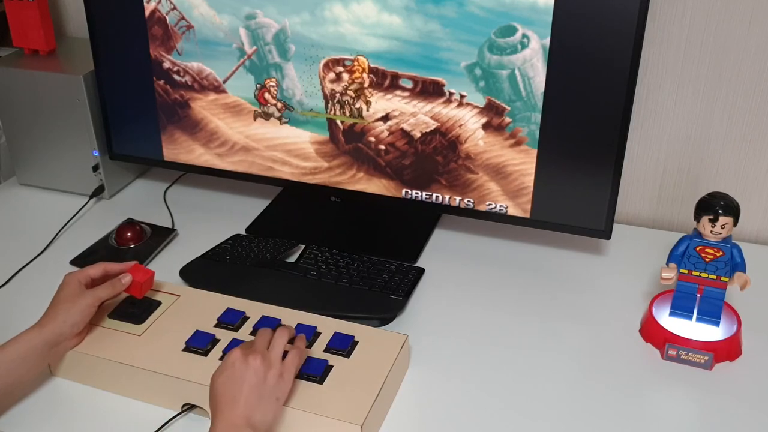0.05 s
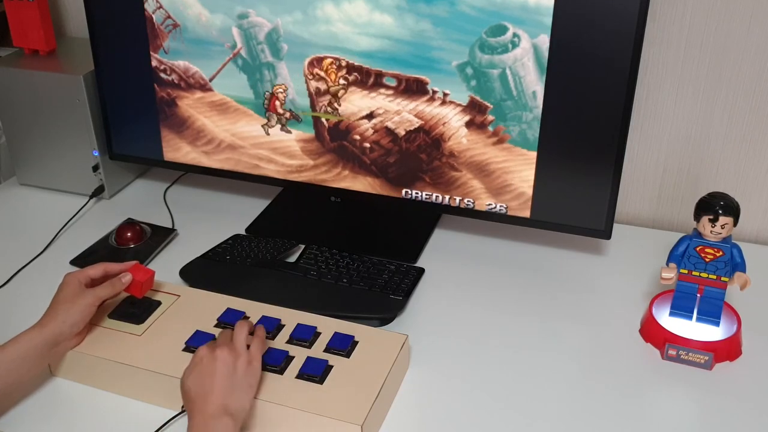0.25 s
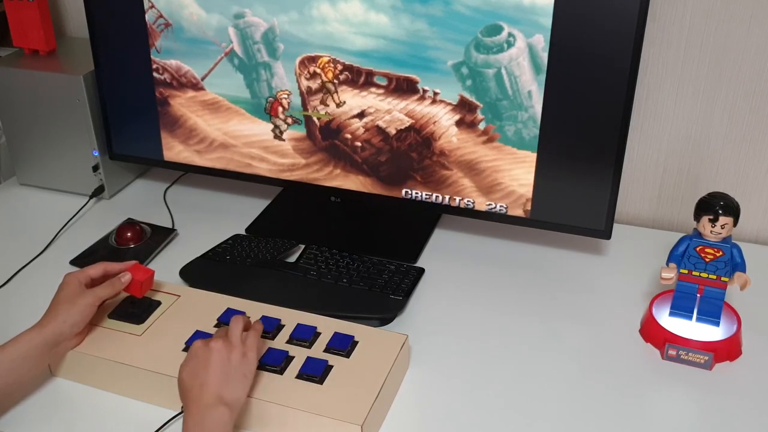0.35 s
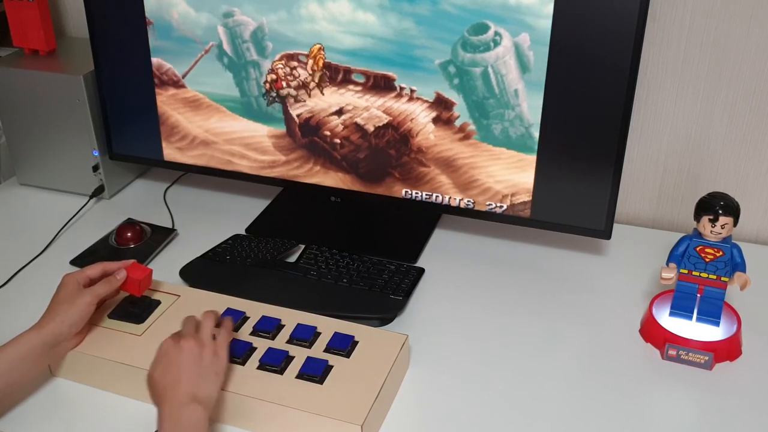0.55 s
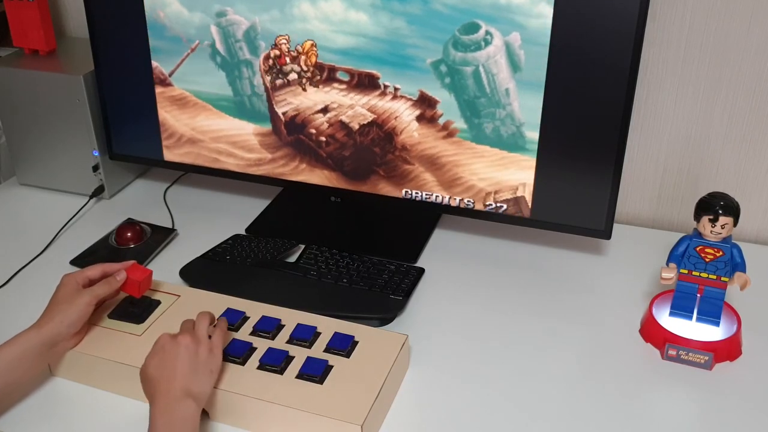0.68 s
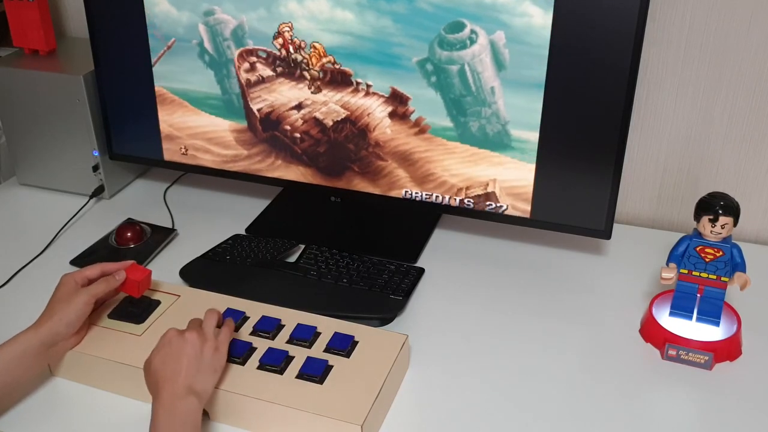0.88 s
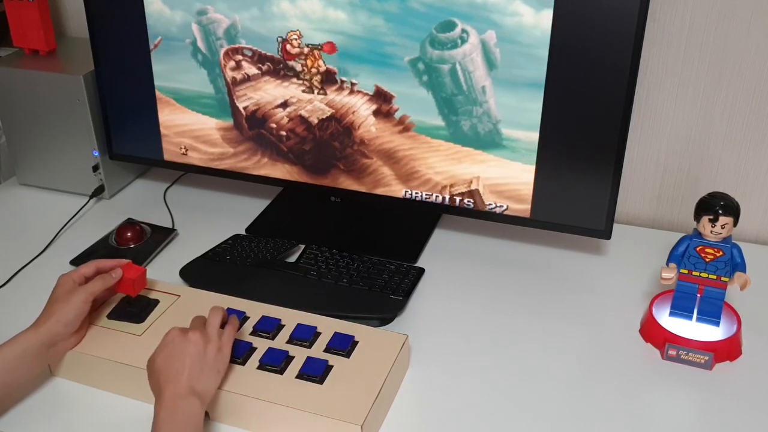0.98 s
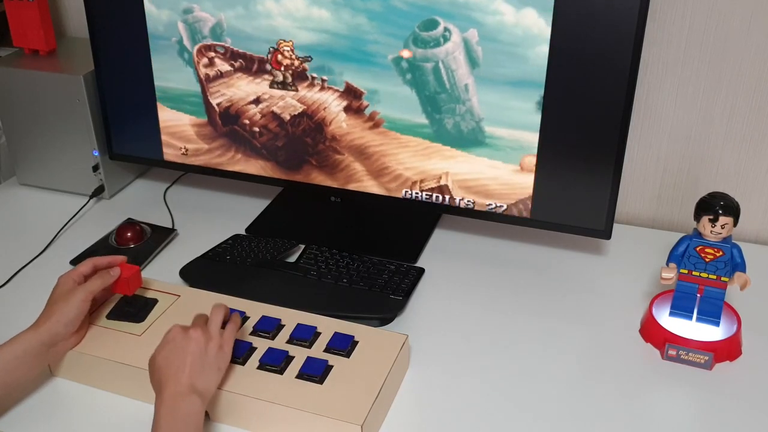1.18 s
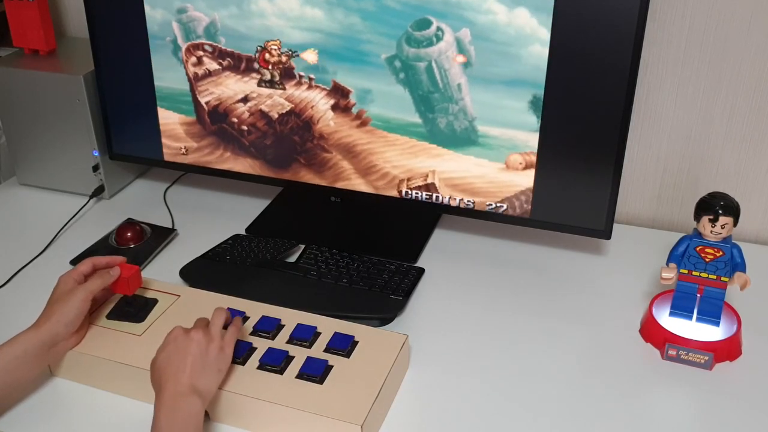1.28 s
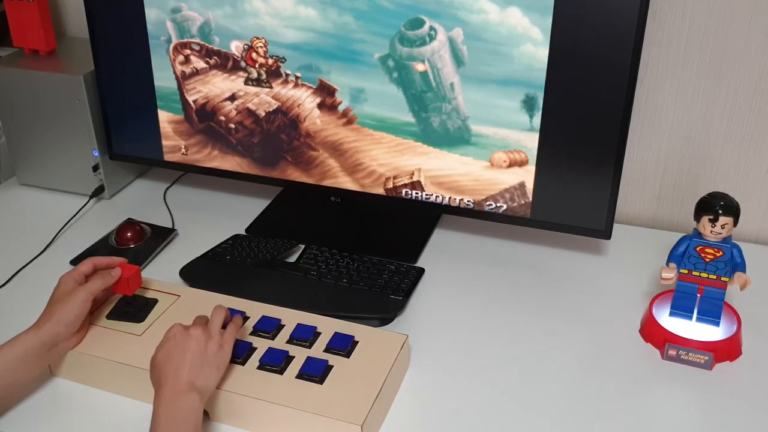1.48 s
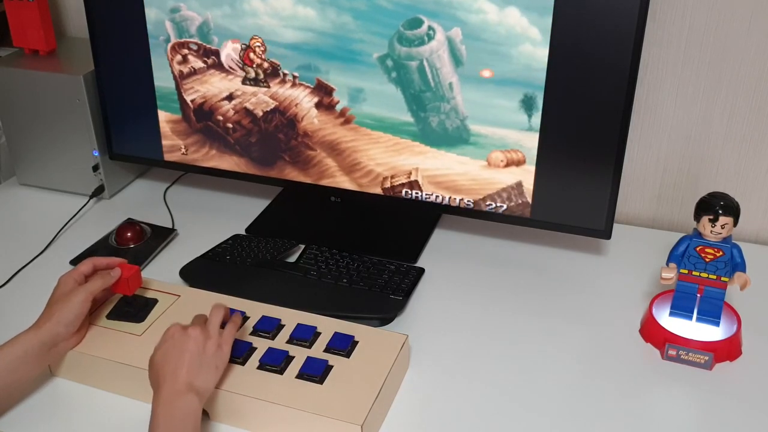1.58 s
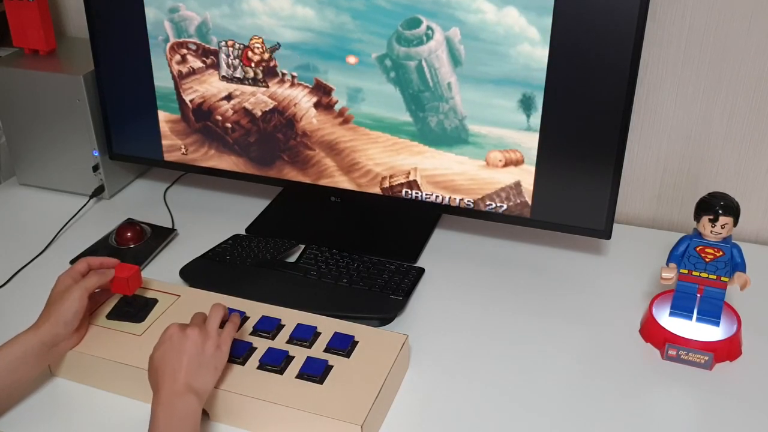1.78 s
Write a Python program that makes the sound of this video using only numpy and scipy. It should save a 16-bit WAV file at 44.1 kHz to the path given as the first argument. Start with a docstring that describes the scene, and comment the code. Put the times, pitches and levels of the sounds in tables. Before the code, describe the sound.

Buttons and joystick clack against a hollow cardboard box in quick uneven bursts, with desk thuds and faint scraping; the hits weaken toward the end. Small reflective room, stereo pickup, faint hiss and no game sound.

```python
"""A small, bare room: a homemade cardboard arcade controller is played on a desk before two microphones.
Buttons and stick knock on the hollow box, their switches click, and the hands thump the box onto the desk.
Each blow is a push, a rattle and a room tail of noise, filtered to its colour; box and desk add damped sines.
The stick scrapes in its cardboard gate as random grains smeared by the room, and the hollow box rumbles as
resonant noise, over a faint rumble and hiss of filtered noise."""
import sys
import numpy as np
from scipy import signal
from scipy.fft import rfft, irfft, next_fast_len
from scipy.io import wavfile

SR = 44100
rng = np.random.default_rng(int(sys.argv[2]) if len(sys.argv) > 2 else 0)


def put_to_file(sound):
    """Save the sound as 16-bit audio at rate SR, in the file named by the first command-line argument."""
    columns = np.atleast_2d(sound).T  # one column per channel
    safe = np.clip(columns, -1, 1)
    whole_steps = np.round(safe * 32767)
    wavfile.write(sys.argv[1], SR, whole_steps.astype(np.int16))


N = 81585  # length in samples
HIT_T = np.arange(int(.55 * SR)) / SR  # time within one blow, s


def knocks():
    """Buttons and stick knock the hollow box; hard landings add a bright edge with a strong room tail."""
    # Each row: start in seconds, level in dB, hard edge in dB relative to the knock, pitch ratio of the knock's colour.
    knock_rows = [(0.001, -43.5, -19, 0.75), (0.192, -37.5, -0.5, 0.66), (0.1976, -29, -7.5, 1.13),
                  (0.215, -31, -1.5, 1.03), (0.234, -28.5, -0.5, 0.94), (0.2434, -25, -6.5, 0.99),
                  (0.3662, -43.5, -23, 0.86), (0.405, -39, -23, 0.92), (0.420, -33, -24, 0.97),
                  (0.433, -33.5, -18, 1.14), (0.4385, -23, -18, 0.966), (0.455, -27.5, -11, 0.99),
                  (0.569, -28.5, -11.5, 1.12), (0.582, -27.5, -9.5, 0.89), (0.760, -31.5, -12, 1.04),
                  (0.7758, -17, -7.5, 1.045), (0.780, -19, -4, 1.08), (0.801, -24.5, -6, 0.99),
                  (0.815, -31.5, -7, 1.16), (0.839, -27.5, -15, 0.87), (0.875, -38, -1.5, 0.68),
                  (0.9364, -29.5, -16, 0.92), (0.957, -33, -9.5, 1), (0.994, -35.5, -20, 1.18),
                  (1.002, -29.5, -0.5, 0.98), (1.060, -35.5, -6, 1.08), (1.1005, -22, -19.5, 1.05),
                  (1.121, -28.5, -18, 0.97), (1.166, -40, -13, 0.74), (1.182, -29.5, -25, 1.1),
                  (1.1864, -32, -16, 1.13), (1.305, -36, -35, 1.23), (1.326, -33, -30, 0.74),
                  (1.371, -30.5, -24, 0.95), (1.376, -26.5, -24, 1.025), (1.402, -37, -4.5, 0.88),
                  (1.4442, -35, -9, 0.86), (1.5104, -29.5, -11, 0.97), (1.549, -31, -19, 0.93),
                  (1.596, -44, -0.5, 0.75), (1.622, -39.5, -3, 0.97), (1.7457, -35.5, -21, 0.67),
                  (1.758, -42, -19, 1.22)]
    # Lasting rings of the box. Each row: frequency in Hz, relative level in dB, t60 in seconds.
    box_modes = [(396, -8, 0.41), (495.5, 0, 0.31), (584.6, 5, 0.27), (634.6, -6.5, 0.21), (741, -8, 0.27),
                 (797, -7, 0.28), (833, 7, 0.084), (861, 2, 0.2), (950, -7, 0.35), (1008, -3.5, 0.2),
                 (1087, -3, 0.13), (1250, -21, 0.14), (1700, -28, 0.3)]
    # Colour of the hollow knock. Each row: frequency in Hz, gain in dB.
    knock_colour = [(120, -24), (300, -14.5), (450, -16), (600, 2.5), (780, 1.5), (1000, -3.5),
                    (1200, -21.5), (1600, -18), (2500, -63.5), (5000, -52.5)]
    # Colour of the hard edge. Each row: frequency in Hz, gain in dB.
    edge_colour = [(500, -21.5), (1100, 3.5), (1700, -3), (2300, -11), (3200, -14), (3600, -25.5),
                   (6000, -22), (12000, -26.5)]
    ring_db = -3  # the box's ring relative to the knock, before choking
    damping_edge_db = -11  # landings harder than this hold the lid down and choke its ring
    out = np.zeros((2, N))
    for start_s, db, edge_db, pitch in knock_rows:
        hit = contact(rattle_t60=0.028, rattle_db=0, room_t60=0.18, room_db=-2, build_s=0.012, width=0.78)
        hit = dent(reflect(hit), depth_db=6.0, order=260)
        knock = unit(colour(hit, knock_colour, pitch))

        choke = np.hypot(1, undb(edge_db - damping_edge_db))
        lid = ring(box_modes, scatter_db=4.0, spread=0.41, attack_s=0.0027) / choke
        body = knock + undb(ring_db) * lid

        crack = contact(rattle_t60=0.057, rattle_db=3.5, room_t60=0.25, room_db=8.5, build_s=0.0028)
        edge = unit(colour(dent(crack, depth_db=1.5, order=200), edge_colour))
        add(out, start_s, undb(db) * (body + undb(edge_db) * edge))
    return out


def thumps():
    """The hands' weight thuds through the box into the desk; where it lands decides which modes ring most."""
    # Each row: start in seconds, level in dB, deep boom in dB relative to the thump,
    # frequency in Hz around which the desk rings most.
    thump_rows = [(0.005, -49, 2, 210), (0.198, -37, 2, 131), (0.217, -35, 10, 192),
                  (0.237, -27.5, 10, 360), (0.25, -21.5, -12, 152.4), (0.300, -36.5, -8, 144),
                  (0.33, -44, 11, 200), (0.434, -32, -4, 210), (0.461, -34.5, -12, 118),
                  (0.608, -43.5, 7, 138), (0.777, -31, 4, 245), (0.792, -25, -2, 201),
                  (0.827, -40, -14, 144), (0.999, -33, 6, 220), (1.116, -35, -23, 270),
                  (1.322, -37.5, -25, 231), (1.413, -35, -1, 117), (1.483, -42, -9, 151),
                  (1.602, -38.5, 3, 199), (1.634, -41.5, 9.5, 152), (1.668, -50, -3, 198)]
    # Rings of the desk under the box. Each row: frequency in Hz, relative level in dB, t60 in seconds.
    desk_modes = [(117.1, 9.5, 0.12), (141.5, 5, 0.2), (212, -1, 0.3), (276.4, 2, 0.28), (291.4, -5, 0.26),
                  (399.2, 7.5, 0.16)]
    # Deep boom. Each row: frequency in Hz, relative level in dB, t60 in seconds.
    boom_modes = [(54.5, 33, 0.16), (66.4, -7, 0.059)]
    # Colour of the thud. Each row: frequency in Hz, gain in dB.
    thud_colour = [(25, -15), (50, -7.5), (90, -15), (135, -3.5), (230, -3), (400, -8.5), (600, -14.5),
                   (1500, -46)]
    thud_db = -1  # relative to the ring of the desk
    focus_db_per_octave = 21.5  # how fast desk modes weaken away from the focus
    out = np.zeros((2, N))
    for start_s, db, boom_db, focus_hz in thump_rows:
        hit = contact(rattle_t60=0.12, rattle_db=-12.5, room_t60=0.21, room_db=0.5, build_s=0.023)
        thud = unit(colour(hit, thud_colour))
        focused_modes = []
        for hz, mode_db, t60 in desk_modes:
            octaves_away = abs(np.log2(hz / focus_hz))
            focused_modes.append((hz, mode_db - focus_db_per_octave * octaves_away, t60))
        desk = ring(focused_modes, scatter_db=1, spread=.2, attack_s=.008)
        boom = ring(boom_modes, scatter_db=1, spread=.3, attack_s=.01)
        add(out, start_s, undb(db) * (undb(thud_db) * thud + desk + undb(boom_db) * boom))
    return out


def snaps():
    """The button switches snap over and ring briefly, heard mostly by way of the walls."""
    # Each row: start in seconds, level in dB.
    snap_rows = [(0.1987, -33), (0.211, -32), (0.24, -30)]
    # Resonances of a switch. Each row: frequency in Hz, width in Hz, relative level in dB.
    switch_modes = [(4160, 75, 4), (4400, 130, 7), (5620, 450, -6), (7000, 2100, -6), (9400, 170, -8),
                    (10500, 380, 4), (14200, 1250, 15)]
    # Colour of a snap. Each row: frequency in Hz, gain in dB.
    switch_colour = [(1500, 6), (4000, 3.5), (9000, 11), (15000, -16.5)]
    out = np.zeros((2, N))
    for start_s, db in snap_rows:
        hit = contact(rattle_t60=0.06, rattle_db=14, room_t60=0.22, room_db=15, build_s=0.0057)
        snap = unit(colour(resonate(hit, switch_modes), switch_colour))
        add(out, start_s, undb(db) * snap)
    return out


def releases():
    """A let-go button ticks as its spring returns it, a broad click that the room draws out."""
    # Each row: start in seconds, level in dB.
    release_rows = [(0.570, -40.5), (0.582, -43.5), (1.5676, -45.5), (1.618, -43.5)]
    # Colour of the tick. Each row: frequency in Hz, gain in dB.
    release_colour = [(1000, -4), (2200, 1), (3800, -21), (4700, -6), (5500, 2), (8600, -3), (10000, -6),
                      (15000, -22)]
    out = np.zeros((2, N))
    for start_s, db in release_rows:
        hit = contact(rattle_t60=0.1, rattle_db=12, room_t60=0.3, room_db=14.5, build_s=0.01)
        add(out, start_s, undb(db) * unit(colour(hit, release_colour)))
    return out


def clicks():
    """Button caps and stick click lightly and brightly on the cardboard, heard mostly by way of the walls."""
    # Each row: start in seconds, level in dB, tilt of the colour in dB per octave.
    click_rows = [(0.238, -32, -4), (0.4206, -44.5, -1), (0.433, -43, -2.5), (0.445, -46.5, 11),
                  (0.7616, -38.5, -2), (0.776, -35, -5), (0.861, -44, -4.5), (0.942, -50, 3),
                  (0.9785, -42, -4), (1.0675, -48.5, -2), (1.107, -46, -3), (1.18, -45, 1),
                  (1.266, -50.5, -5), (1.290, -51, 4), (1.371, -41.5, -1), (1.405, -47.5, -5),
                  (1.458, -43.5, 1), (1.6183, -40, -2), (1.674, -47.5, -0.5), (1.7471, -52.5, -4)]
    # Colour of a click. Each row: frequency in Hz, gain in dB.
    click_colour = [(900, -15), (2000, 1), (3400, -6.5), (4300, -5.5), (5100, -8), (6500, 2.5), (8000, 3.5),
                    (10200, 5), (12000, 1.5), (14300, -9.5), (15500, -34)]
    out = np.zeros((2, N))
    for start_s, db, tilt_db in click_rows:
        hit = contact(rattle_t60=0.1, rattle_db=0, room_t60=0.32, room_db=11.0, build_s=0.0034)
        hit = dent(hit, depth_db=4.0, order=90)
        add(out, start_s, undb(db) * unit(colour(hit, click_colour, tilt_db=tilt_db)))
    return out


def scrape():
    """The stick catches and slips in its gate in small, uneven grains that the room smears."""
    # Level of the scraping stick. Each row: time in seconds, level in dB.
    scrape_levels = [(0, -53), (.18, -79), (.36, -44), (.52, -47.5), (.68, -51.5), (0.76, -40), (.98, -39),
                     (1.08, -42.5), (1.16, -42), (1.25, -46), (1.351, -44.5), (1.48, -43.5), (1.65, -45),
                     (1.72, -45), (1.85, -60.5)]
    # Colour of the scraping. Each row: frequency in Hz, gain in dB.
    scrape_colour = [(150, -15), (300, -0.5), (600, 0.5), (1000, -0.5), (1500, -16.5), (3000, -33),
                     (5000, -32), (8000, -22), (11000, -28), (14000, -32), (15500, -59)]
    grains_per_s = 500  # on average
    chance, size = rng.random(N), rng.standard_normal(N)
    grains = (chance < grains_per_s / SR) * size
    room = contact(rattle_t60=0.035, rattle_db=7, room_t60=0.2, room_db=6, build_s=0.018)
    smeared = signal.fftconvolve(grains[None], room, axes=1)[:, :N]
    return ride(colour(smeared, scrape_colour), scrape_levels)


def rumble():
    """The shifting hands keep the hollow box rumbling: noise through its resonances, twice over."""
    # Air and panel resonances of the box. Each row: frequency in Hz, width in Hz, relative level in dB.
    rumble_modes = [(54, 8.1, -4.5), (120, 2.5, -5), (213.4, 16, -18)]
    # Level of the rumble. Each row: time in seconds, level in dB.
    rumble_levels = [(0, -46), (.16, -59.5), (.31, -71), (.40, -42), (0.559, -58), (.68, -52),
                     (0.922, -43.5), (1.2, -42.5), (1.3, -54.5), (1.5, -41.5), (1.66, -44), (1.82, -56)]
    narrow = resonate(diffuse(N, width=0.77), rumble_modes)
    wider_modes = [(hz, 3 * width_hz, 0) for hz, width_hz, _ in rumble_modes]
    return ride(resonate(narrow, wider_modes), rumble_levels)


def room_tone():
    """Faint steady rumble and hiss: filtered noise from all sides."""
    # Colour of the room tone. Each row: frequency in Hz, gain in dB.
    tone_colour = [(25, -37), (55, -17), (90, 3), (125, -9), (300, -0.5), (500, 1.5), (1000, -16),
                   (2000, -21), (4000, -22), (8000, -28.5), (15000, -18.5)]
    tone = colour(diffuse(N), tone_colour)
    return tone / tone.std() * undb(-58)


def contact(rattle_t60, rattle_db, room_t60, room_db, build_s, width=1):
    """One push, a short rattle of cardboard and desk reflections, then the room's tail building and dying."""
    lead_s = .00009  # the left microphone hears the push this much sooner
    arrival_s = np.array([[lead_s], [2 * lead_s]])
    push = np.sinc((HIT_T - arrival_s) * SR)
    rattle = diffuse(len(HIT_T), width) * fade(rattle_t60)
    build = 1 - np.exp(-HIT_T / build_s)
    room = diffuse(len(HIT_T), width) * fade(room_t60) * build
    return unit(push) + undb(rattle_db) * unit(rattle) + undb(room_db) * unit(room)


def ring(modes, scatter_db, spread, attack_s):
    """Damped modes, weighted and detuned anew at each blow by the hands' load, phase-shifted per microphone."""
    drift = .012  # typical detuning, as a fraction of the frequency; spread is a phase in radians
    out = 0
    for (hz, db, t60), (size, shift, detune) in zip(modes, rng.standard_normal((len(modes), 3))):
        phase = spread * shift * np.array([[1], [-1]])
        angle = 2 * np.pi * hz * (1 + drift * detune) * HIT_T + phase
        out = out + undb(db + scatter_db * size) * fade(t60) * np.sin(angle)
    return unit(out * (1 - np.exp(-HIT_T / attack_s)))


def resonate(x, modes):
    """Pass a sound through parallel resonances (Hz, width in Hz, dB)."""
    out = 0
    for hz, width_hz, db in modes:
        b, a = signal.iirpeak(hz, hz / width_hz, fs=SR)
        out = out + undb(db) * signal.lfilter(b, a, x)
    return out


def reflect(x):
    """Add the early reflections; their paths change a little with the spot that is struck."""
    # From the screen and from the wall. Each row: typical delay in seconds, level in dB.
    reflections = [(.0052, -4.5), (.0205, -14)]
    out = x
    for (delay_s, db), stray in zip(reflections, rng.standard_normal(len(reflections))):
        lag = int(abs(delay_s * (1 + .04 * stray)) * SR)
        out = out + undb(db) * np.pad(x, ((0, 0), (lag, 0)))[:, :x.shape[1]]
    return out


def dent(x, depth_db, order):
    """Roughen the spectrum with a random ripple, drawn anew for each hit."""
    spectrum = rfft(x, 2 * x.shape[-1])
    place = np.linspace(0, 1, spectrum.shape[-1])
    ripple = np.interp(place, np.linspace(0, 1, order), rng.standard_normal(order))
    return irfft(spectrum * undb(depth_db * ripple))[..., :x.shape[-1]]


def diffuse(size, width=1):
    """Noise from all sides: alike left and right in the bass, unrelated in the treble."""
    wide_hz, bass_width = 1100, 0.24
    mid, side = rfft(rng.standard_normal((2, size)))
    hz = np.arange(len(mid)) * SR / size
    apart = np.clip(width * np.hypot(bass_width, hz / wide_hz), 0, 1)
    pair = np.array([mid + apart * side, mid - apart * side])
    return irfft(pair / np.hypot(1, apart), size)


def colour(x, points, pitch=1, tilt_db=0):
    """Causal minimum-phase filter through (Hz, dB) points, shifted in pitch and tilted per octave."""
    n = 2 * next_fast_len(x.shape[-1])
    hz = np.maximum(np.arange(n // 2 + 1) * SR / n, 1)
    octaves_up = np.log2(np.maximum(hz / points[0][0], 1))  # above the first point
    gain_db = on_log(hz / pitch, points) + tilt_db * octaves_up
    # folding the cepstrum forward in time makes the filter causal
    cepstrum = irfft(np.log(undb(gain_db)))
    cepstrum[1:n // 2] *= 2
    cepstrum[n // 2 + 1:] = 0
    return irfft(rfft(x, n) * np.exp(rfft(cepstrum)))[..., :x.shape[-1]]


def on_log(hz, points):
    """Read (Hz, value) points on a log-frequency axis."""
    f, v = np.array(points).T
    return np.interp(np.log(np.maximum(hz, 1)), np.log(f), v)


def undb(db):
    """Turn dB into an amplitude factor."""
    return 10 ** (np.asarray(db) / 20)


def fade(t60):
    """Exponential decay by 60 dB in t60 seconds."""
    return np.exp(-np.log(1000) * HIT_T / t60)


def unit(x):
    """Scale a hit to the energy of 10 ms at full level."""
    energy = np.mean(np.atleast_2d(x) ** 2, axis=0).sum()
    return x / np.sqrt(energy / (.01 * SR))


def ride(x, levels):
    """Level a lasting sound, then ride it along (s, dB) points."""
    times_s, db = np.array(levels).T
    return x / x.std() * undb(np.interp(np.arange(N) / SR, times_s, db))


def add(out, start_s, sound):
    """Mix a sound in at its time."""
    i = int(start_s * SR)
    out[:, i:i + sound.shape[1]] += sound[:, :N - i]


def scene():
    """Sum the blows, the scraping, the rumble and the room tone."""
    return knocks() + thumps() + snaps() + releases() + clicks() + scrape() + rumble() + room_tone()


def record(dry):
    """The two microphones differ a little in colour; the deepest bass and the top are cut."""
    # Balance of the microphones. Each row: frequency in Hz, left minus right in dB.
    balance = [(60, -3), (125, -2.5), (260, -1.4), (600, -0.2), (1200, 0), (2500, 0), (4500, 0.9),
               (8500, -1), (13000, -0.5)]
    low_cut_hz, top_hz = 67.6, 15500
    left = colour(dry[0], [(hz, db / 2) for hz, db in balance])
    right = colour(dry[1], [(hz, -db / 2) for hz, db in balance])
    low_cut = signal.butter(2, low_cut_hz, "high", fs=SR, output="sos")
    top_cut = signal.ellip(10, .2, 80, top_hz, fs=SR, output="sos")
    return signal.sosfilt(top_cut, signal.sosfilt(low_cut, np.array([left, right])))


dry = scene()
out = record(dry)
put_to_file(out)
```